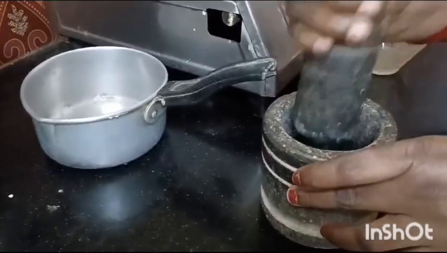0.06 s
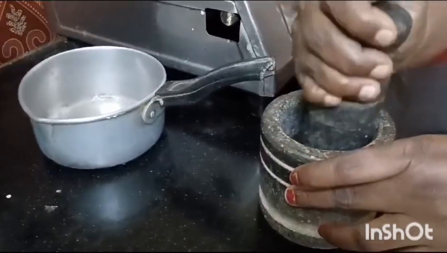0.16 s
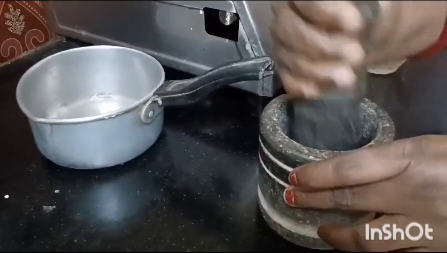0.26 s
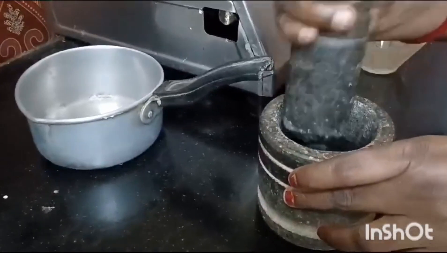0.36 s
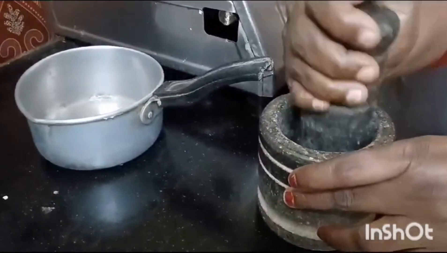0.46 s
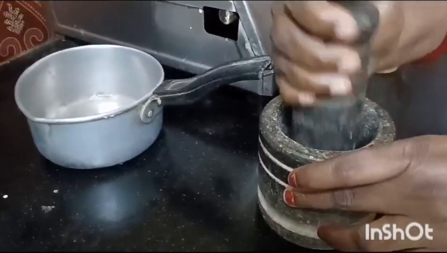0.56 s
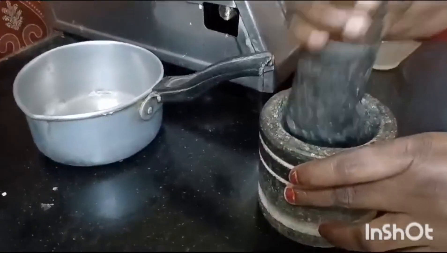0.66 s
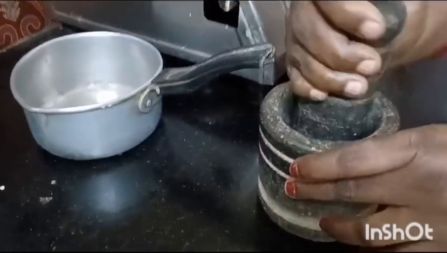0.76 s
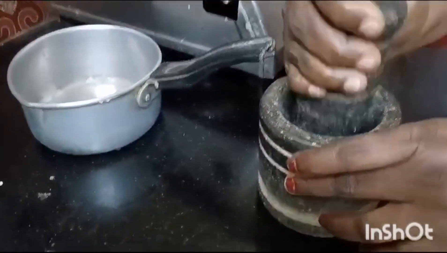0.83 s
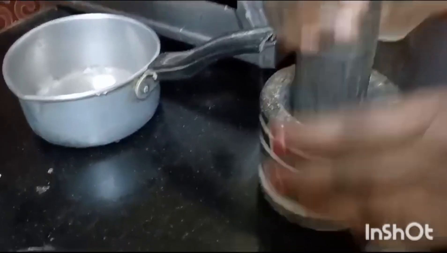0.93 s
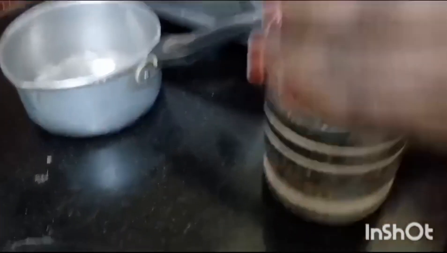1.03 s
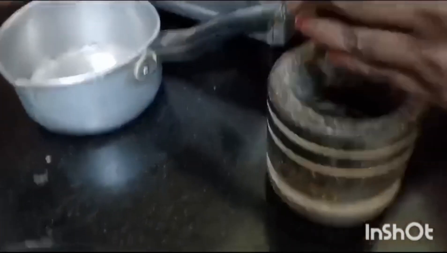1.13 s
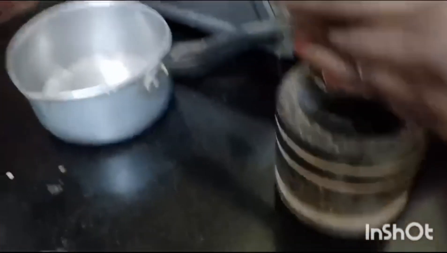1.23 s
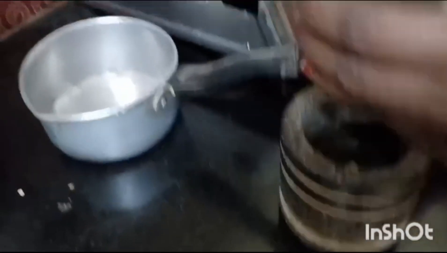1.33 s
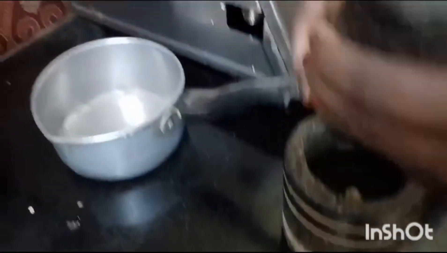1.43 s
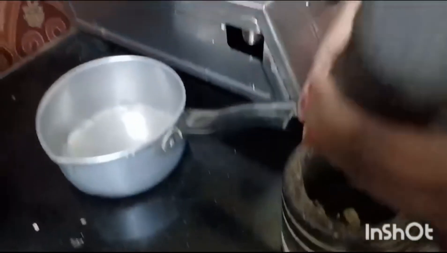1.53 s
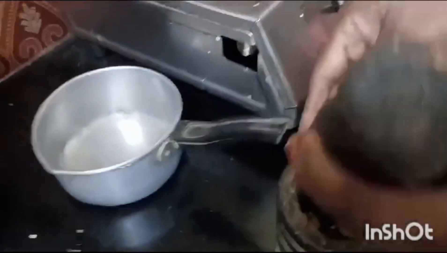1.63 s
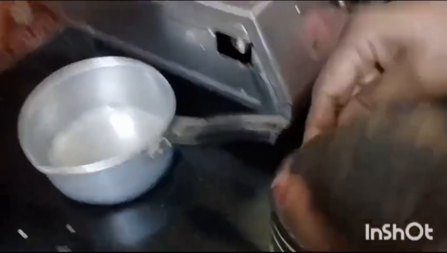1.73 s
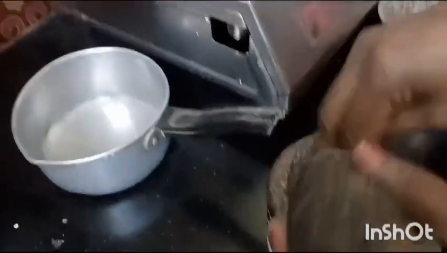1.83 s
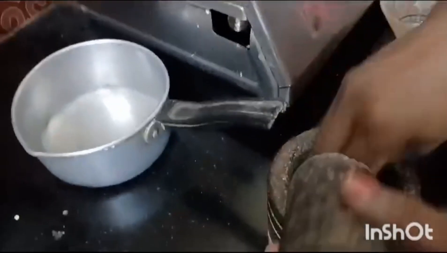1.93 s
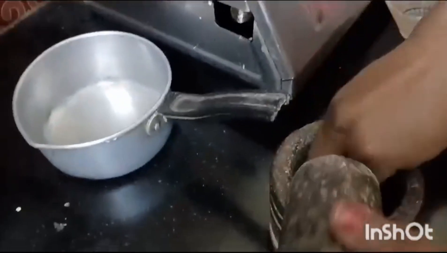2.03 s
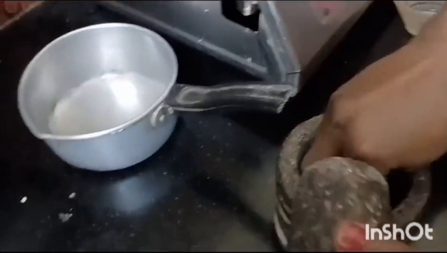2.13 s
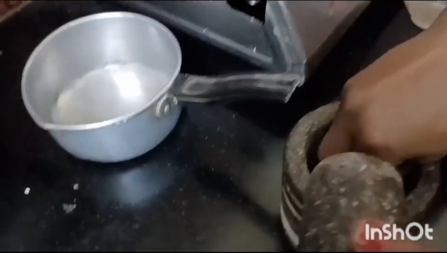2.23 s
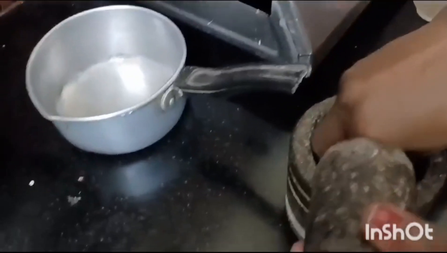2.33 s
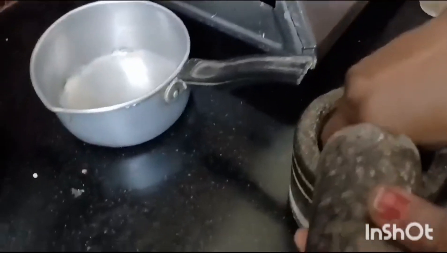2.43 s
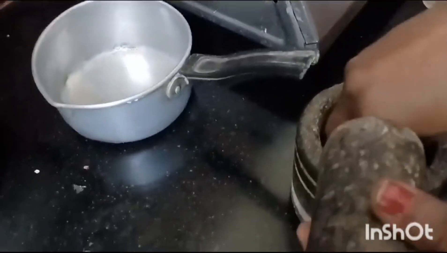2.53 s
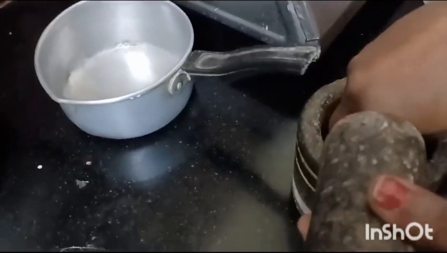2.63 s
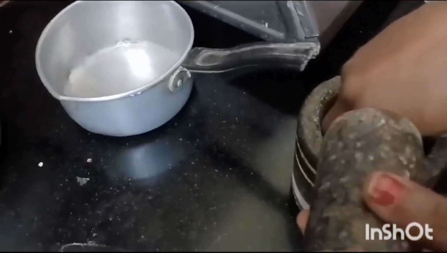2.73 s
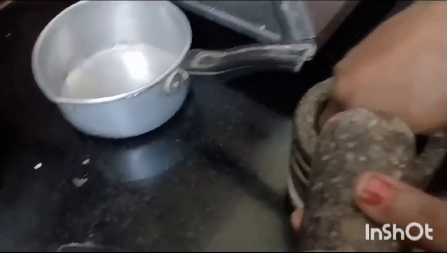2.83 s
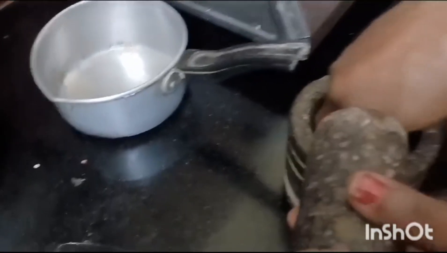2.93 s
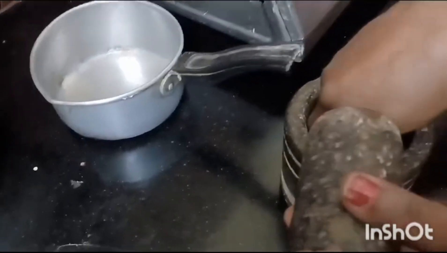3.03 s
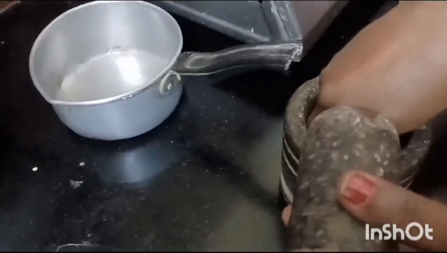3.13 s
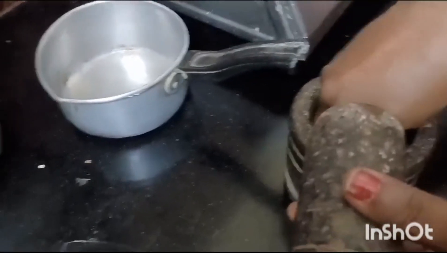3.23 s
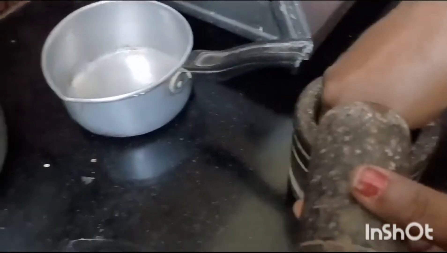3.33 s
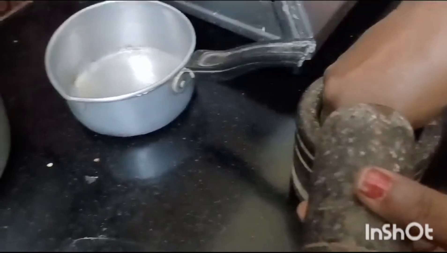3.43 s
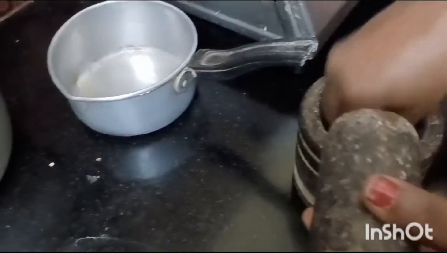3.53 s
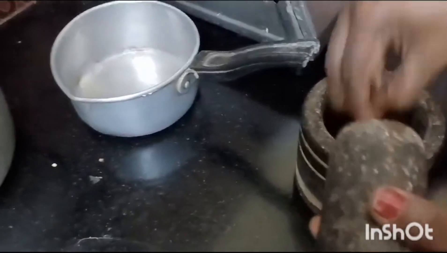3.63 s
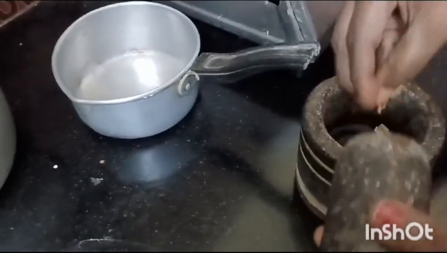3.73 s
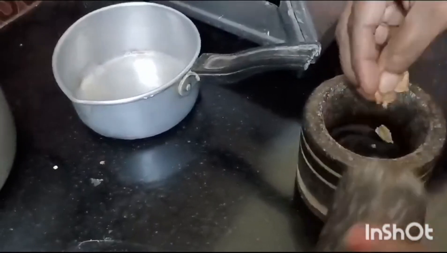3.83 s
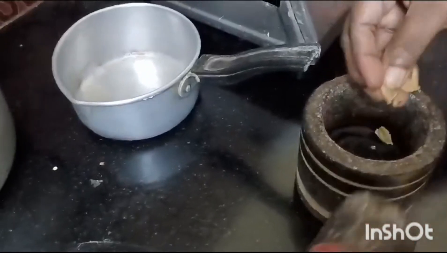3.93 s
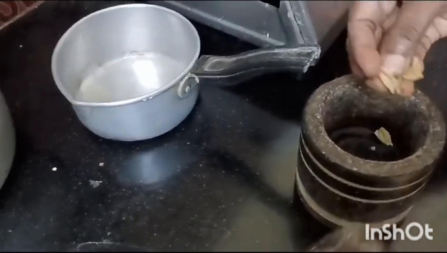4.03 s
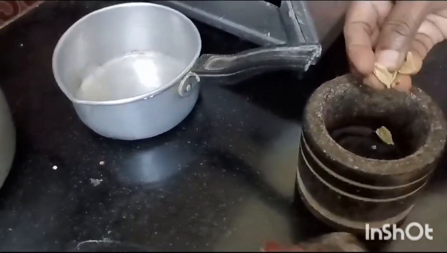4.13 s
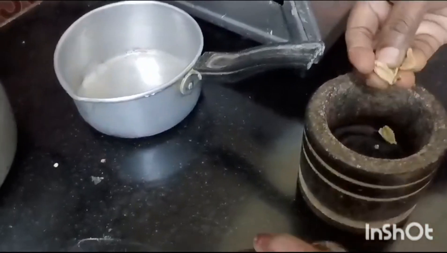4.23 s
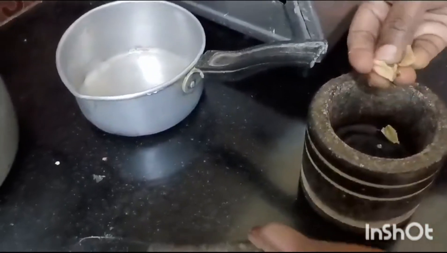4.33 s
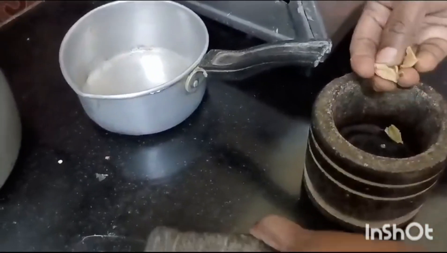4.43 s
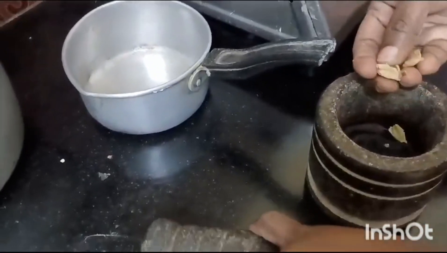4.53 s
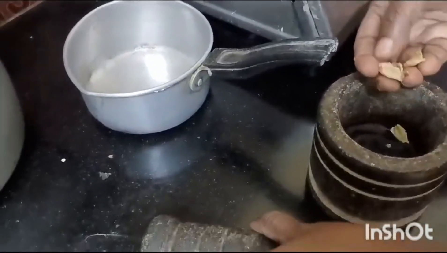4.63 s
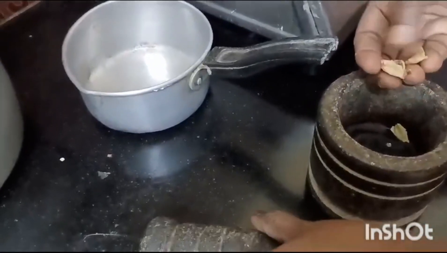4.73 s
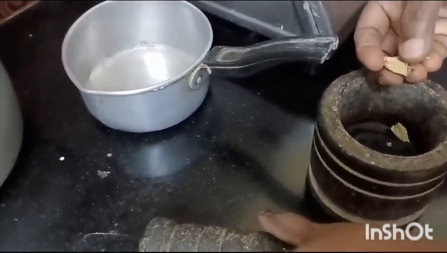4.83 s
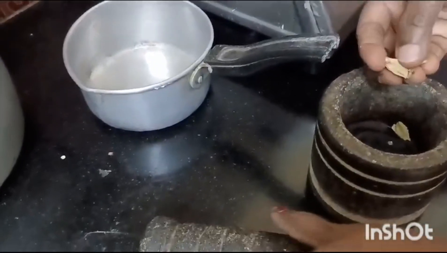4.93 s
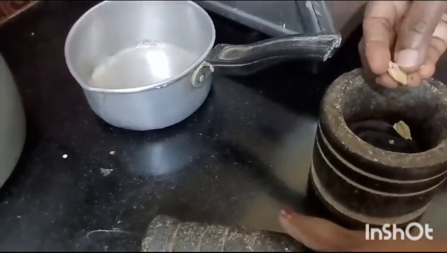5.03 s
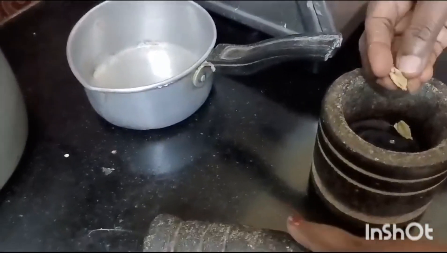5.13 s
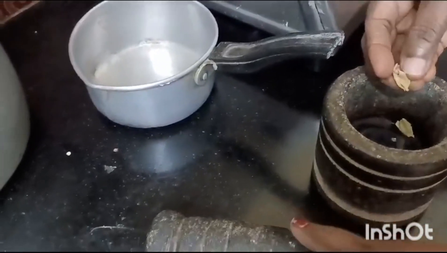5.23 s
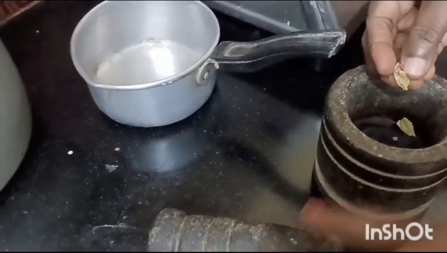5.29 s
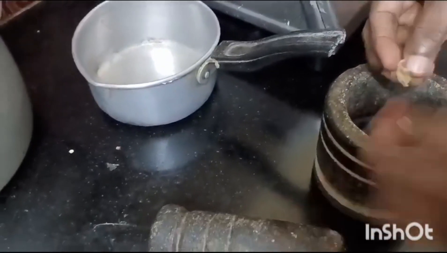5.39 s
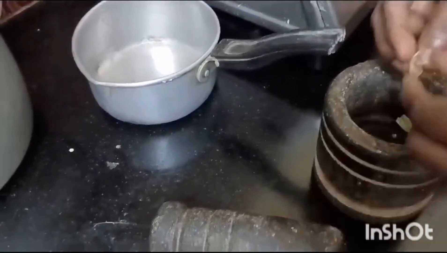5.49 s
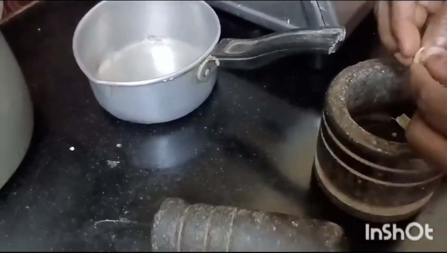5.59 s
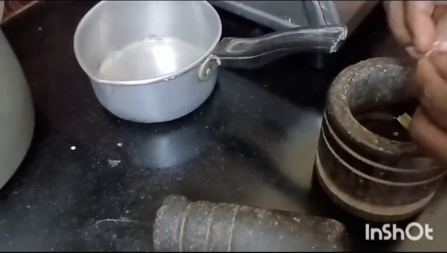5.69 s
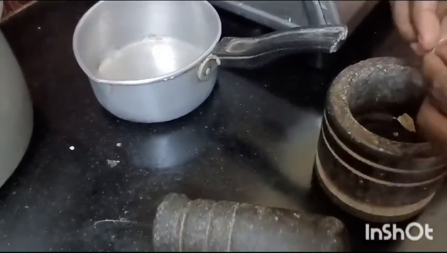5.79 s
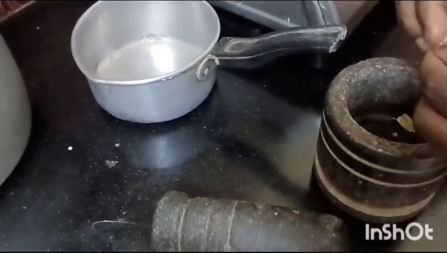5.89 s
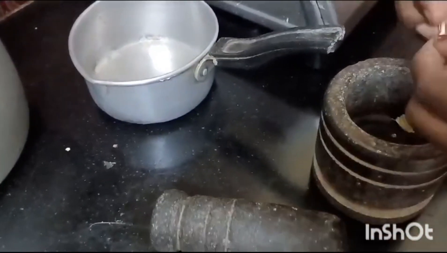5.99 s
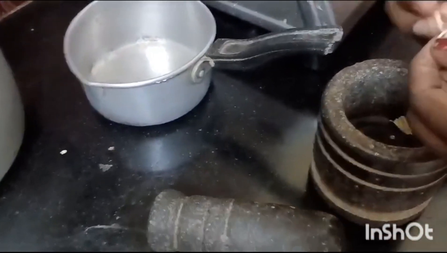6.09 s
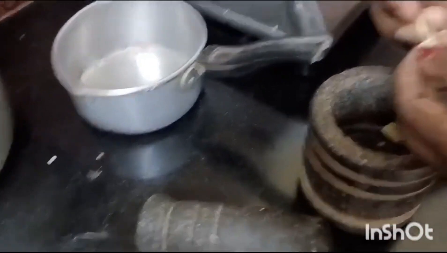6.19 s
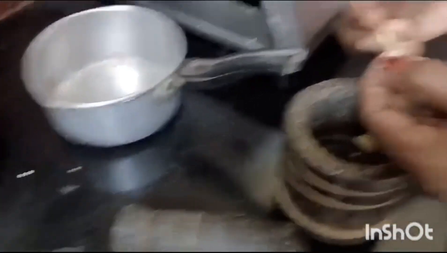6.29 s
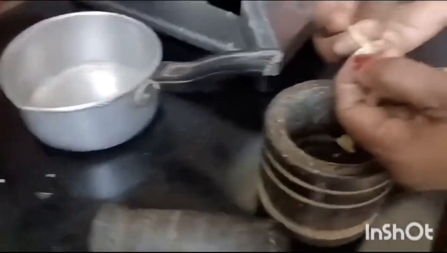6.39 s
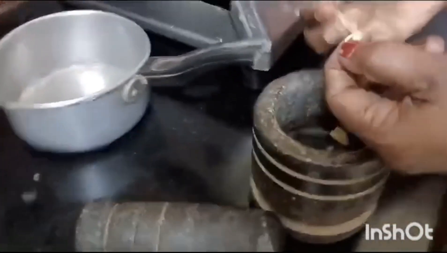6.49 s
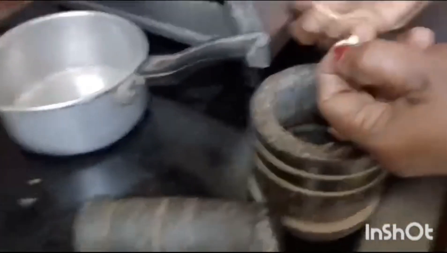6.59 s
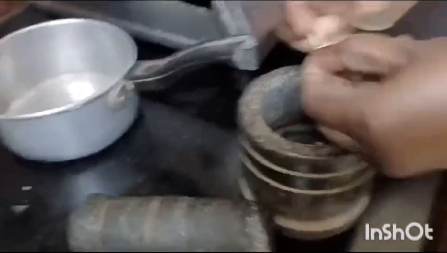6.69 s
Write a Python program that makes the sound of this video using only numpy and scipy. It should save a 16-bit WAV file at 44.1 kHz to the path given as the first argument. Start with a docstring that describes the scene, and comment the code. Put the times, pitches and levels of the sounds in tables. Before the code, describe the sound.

In an echoing kitchen, a short run of steady stone-on-stone blows crushes spices in a mortar, stopping after about a second. Quieter handwork follows, close to the microphone and to the right: bright bangle clinks, faint rubbing and dry husks snapping. The pestle knocks and rocks as it is put on the counter, then the bangles clink again and a cluster of soft bumps ends the work.

```python
"""The last of a stone-on-stone blow, then three more: a pestle pounds spices in a mortar on a kitchen counter.
The room is hard and echoing. Fingers stir the husks, and the pestle is laid down with a knock and rocks.
Pods are picked open by hand, with bright clinks as of bangles, close on the right, and dull bumps.
Struck things are decaying sine modes with noise echoes; rubbing, husks and air are coloured noise."""
import sys
import numpy as np
from scipy import signal
from scipy.fft import rfft, irfft, next_fast_len
from scipy.io import wavfile

SR = 44100
rng = np.random.default_rng(int(sys.argv[2]) if len(sys.argv) > 2 else 0)


def transcribe(signal):
    """Save signal, clipped to [-1, 1], as a 16-bit WAV file at the path in sys.argv[1]."""
    frames = np.atleast_2d(signal).T
    limited = np.clip(frames, -1, 1)
    pcm = np.round(limited * 32767).astype(np.int16)
    wavfile.write(sys.argv[1], SR, pcm)


N = 297675
AGE = np.arange(int(1.6 * SR)) / SR  # seconds since a sound began


def from_db(db):
    """Decibels to amplitude gain."""
    return 10 ** (np.asarray(db) / 20)


def at_hz(points, hz):
    """Read a table of levels on a log-frequency axis."""
    table = np.array(points)
    return np.interp(np.log(np.maximum(hz, 1)), np.log(table[:, 0]), table[:, 1])


def panned(x, pan_db):
    """Place a sound at constant power; positive pan_db leans left, negative leans right."""
    gains = from_db(np.array([[pan_db], [-pan_db]]) / 2)
    return x * gains / np.sqrt(np.mean(gains ** 2))


def add(out, start_s, x):
    """Mix a sound in at its start time, dropping whatever lies outside the scene."""
    start = round(start_s * SR)
    first, last = max(start, 0), min(start + x.shape[-1], N)
    out[:, first:last] += x[..., first - start:last - start]


def colour(x, spectrum):
    """Causal (minimum-phase) filter with the given spectrum, built by folding its cepstrum."""
    size = 2 * next_fast_len(x.shape[-1] // 2 + SR // 10)
    gain = from_db(at_hz(spectrum, np.fft.rfftfreq(size, 1 / SR)))
    cepstrum = irfft(np.log(gain))
    cepstrum[1:size // 2] *= 2
    cepstrum[size // 2 + 1:] = 0
    response = np.exp(rfft(cepstrum))
    return irfft(rfft(x, size) * response)[..., :x.shape[-1]]


def soften(x, cutoff_hz):
    """A soft contact carries no treble: low-pass at its cut-off."""
    lowpass = signal.butter(3, min(cutoff_hz, SR / 3), fs=SR, output="sos")
    return signal.sosfilt(lowpass, x + 1e-18)


def fade(t60_s):
    """Exponential decay by 60 dB in t60_s."""
    return np.exp(-np.minimum(np.log(1000) * AGE / t60_s, 40))


def ring(modes, swell_s):
    """Struck modes of alternating sign, which take a moment to build up."""
    sines = 0
    for k, (hz, db, t60_s) in enumerate(modes):
        sines = sines + (-1) ** k * from_db(db) * np.sin(2 * np.pi * hz * AGE) * fade(t60_s)
    return sines * (1 - np.exp(-AGE / swell_s))


# stereo width of the room, side against mid: pitch_hz [Hz], level_db [dB]
ROOM_WIDTH = [(60, -18.5), (125, -12.5), (250, -8.5), (500, -4.5), (1000, 1.5), (4000, -1.5), (10000, 2)]


def diffuse(size):
    """White stereo noise, alike in both channels in the bass and nearly unrelated in the treble."""
    mid, side = rfft(rng.standard_normal((2, size)))
    width = from_db(at_hz(ROOM_WIDTH, np.fft.rfftfreq(size, 1 / SR)))
    return irfft((mid + width * side * [[1], [-1]]) / np.sqrt(1 + width ** 2), size)


# how long the room rings in each band: pitch_hz [Hz], t60_s [s]
ROOM_T60 = [(60, 2), (150, 1.3939), (350, 1.0), (900, 1.1975), (2400, 0.8966), (5500, 0.9048), (9000, 0.55),
            (15000, 0.37)]


def room(early_db, early_t60_s):
    """Response to a click: strong reflections from close by, then a tail whose treble dies first."""
    noise = rfft(diffuse(len(AGE)))
    hz = np.fft.rfftfreq(len(AGE), 1 / SR)
    centres = np.array(ROOM_T60)[:, 0]
    tail = 0
    # neighbouring bands cross over, and each decays at its own rate
    for share, (_, t60_s) in zip(np.eye(len(centres)), ROOM_T60):
        band = irfft(noise * at_hz(np.c_[centres, share], hz), len(AGE))
        tail = tail + band * fade(t60_s)
    return tail * (1 + from_db(early_db) * fade(early_t60_s))


def echo_of(x, paths):
    """What the room gives back: convolution with its response, scaled to unit energy on the left."""
    return signal.fftconvolve(paths / np.linalg.norm(paths[0]), x[None], axes=1)[:, :len(AGE)]


def steady(spectrum):
    """Stereo noise of the given colour, rms 1."""
    x = colour(diffuse(N), spectrum)
    return x / x.std()


# spectrum of the room's faint air: pitch_hz [Hz], level_db [dB]
AIR_SPECTRUM = [(18, -46.5), (30, -17.5), (134, 0), (189, -12), (287, -10), (499, -16.5), (866, -19.5),
                (1460, -28.5), (4530, -35.5), (8520, -29.5), (16000, -42)]


def room_air():
    """The faint air of the room: steady coloured noise."""
    return from_db(-71.5) * steady(AIR_SPECTRUM)


def lumps(rate_hz, depth_db):
    """Uneven pressure: a random gain with a new target rate_hz times a second."""
    targets = rng.standard_normal(2000)
    wander = np.interp(np.arange(N) / SR * rate_hz, np.arange(2000), targets)
    return from_db(depth_db * wander)


def pressure(start_s, length_s):
    """One stroke presses in, holds, and dies away once the hand lets go."""
    attack_s, release_db_per_s = 0.077, 58
    age = np.arange(N) / SR - start_s
    return np.clip(age / attack_s, 0, 1) * from_db(-release_db_per_s * np.maximum(age - length_s, 0))


# strokes of the hand: start_s [s], length_s [s], rumble_db [dB], hiss_db [dB]
STROKES = [(2.26, .3, -65.5, -81), (2.67, 0.21, -56.5, -77), (3.02, 0.36, -61.5, -77),
           (3.719, 0.16, -59, -95), (4.05, 0.82, -66, -87), (5.84, 0.64, -60.5, -83.5),
           (6.42, .4, -51.5, -74)]
# spectra of the low and high parts of the rubbing: pitch_hz [Hz], level_db [dB]
RUMBLE_SPECTRUM = [(30, -33.5), (70, -17.5), (110, -3), (155, 5), (210, -6.5), (400, -17), (600, -25.5),
                   (1100, -28.5), (2500, -43.5), (8000, -74)]
HISS_SPECTRUM = [(1000, -33.5), (2000, -10.5), (2600, 2), (3400, -5.5), (4300, -2), (6000, -0.5),
                 (7500, -7), (15000, -12.5)]


def rubbing():
    """Fingers drag unevenly over stone and powder: a low rumble and a thin hiss."""
    rumble_gain = hiss_gain = 0
    for start_s, length_s, rumble_db, hiss_db in STROKES:
        press = pressure(start_s, length_s)
        rumble_gain = np.maximum(rumble_gain, from_db(rumble_db) * press)
        hiss_gain = np.maximum(hiss_gain, from_db(hiss_db) * press)
    rumble = rumble_gain * steady(RUMBLE_SPECTRUM) * lumps(rate_hz=78, depth_db=2.0)
    hiss = hiss_gain * steady(HISS_SPECTRUM) * lumps(rate_hz=64, depth_db=3.5)
    return rumble + hiss


# friction sings for a moment: start_s [s], length_s [s], pitch_hz [Hz], width_hz [Hz], level_db [dB]
SQUEAKS = [(-0.05, 0.23, 3080, 402, -53), (2.139, 0.16, 3040, 700, -67), (2.997, 0.57, 547, 69.6, -75),
           (3.821, 0.45, 640, 80, -72), (2.858, 0.6, 2570, 298, -91), (4.268, 0.18, 565, 90, -70),
           (5.771, 0.26, 3990, 300, -71.5)]


def squeaking():
    """Rubbed stone and skin excite one narrow resonance, which swells and fades."""
    out = np.zeros((2, N))
    for start_s, length_s, pitch_hz, width_hz, level_db in SQUEAKS:
        edges = [pitch_hz - width_hz / 2, pitch_hz + width_hz / 2]
        band = signal.butter(2, edges, "band", fs=SR, output="sos")
        tone = signal.sosfilt(band, diffuse(len(AGE)))
        stroke = np.sin(np.pi * np.minimum(AGE / length_s, 1) ** 0.707)
        add(out, start_s, from_db(level_db) * stroke * tone / tone.std())
    return out


# dry husks give way on the right: start_s [s], level_db [dB], length_s [s]
CRACKLES = [(1.558, -76.5, .13), (1.991, -64, 0.038), (2.098, -59, .01), (2.113, -51, 0.014),
            (2.147, -52, 0.032), (2.183, -43, 0.0098), (2.389, -65, .07), (2.516, -58.5, 0.08),
            (2.733, -61.5, 0.059), (3.452, -63.5, 0.029), (5.951, -72, 0.18), (6.085, -55.5, 0.013),
            (6.203, -57, 0.0047), (6.517, -58.5, .008), (6.693, -60.5, 0.051)]
# spectrum of a snapping husk: pitch_hz [Hz], level_db [dB]
HUSK_SPECTRUM = [(800, -64.5), (2200, -78.5), (3000, -65), (5800, -46), (7500, -54), (9500, -49),
                 (14000, -42), (16000, -46.5)]


def crackling():
    """A husk gives way in a short crunch: a random shower of tiny snaps of uneven size."""
    snaps_per_s, snap_spread_db, pan_db = 4500, 2.0, -9.5
    out = np.zeros((2, N))
    paths = room(early_db=11.5, early_t60_s=0.3)
    age = AGE[:SR // 5]
    for start_s, level_db, length_s in CRACKLES:
        happens = rng.random(len(age)) < snaps_per_s / SR
        signs = rng.choice([-1, 1], len(age))
        sizes = from_db(snap_spread_db * rng.standard_normal(len(age)))
        crunch = colour(happens * signs * sizes, HUSK_SPECTRUM)
        swell = np.sin(np.pi * np.minimum(age / length_s, 1) ** 0.69)
        dry_crunch = from_db(level_db) * crunch / crunch.std() * swell
        add(out, start_s, panned(dry_crunch, pan_db))
        # the echo stands less far to the right
        add(out, start_s, from_db(0.5) * panned(echo_of(dry_crunch, paths), pan_db / 2))
    return out


# modes of the kitchen counter: pitch_hz [Hz], level_db [dB], t60_s [s]
COUNTER_MODES = [(73.5, -25, 1.35), (96, -25.5, 1.3), (116, -38, 1.1), (155, -32, .85), (172, -24.5, .8),
                 (199, -23, .6), (214, -22, .6), (232, -14, .75), (328, -25, .9), (431, -23, .7),
                 (476, -26, .9), (581, -32, .8), (624, -29, .8), (694, -29, .7), (737, -27, .8),
                 (847, -24, .9), (919, -31, .8), (1041, -31, .75)]


def light_boom(lowest_hz):
    """Light knocks hardly move the deepest modes of the counter."""
    highpass = signal.butter(2, lowest_hz, "high", fs=SR, output="sos")
    return from_db(-11.5) * signal.sosfilt(highpass, ring(COUNTER_MODES, swell_s=0.019))


# hands and mortar bump the counter: start_s [s], level_db [dB], contact_hz (cut-off) [Hz], boom_db [dB]
BUMPS = [(2.395, -19.5, 129, -8), (2.743, -39, 740, 1), (2.759, -14, 109, -4), (4.29, -14.5, 98.5, 1),
         (5.901, -22.5, 880, -16), (5.926, -17.5, 780, -16), (6.042, -16, 1090, 0.5),
         (6.404, -26.5, 585, -14), (6.448, -13, 1400, -25), (6.477, -17, 860, -13), (6.579, -20.5, 510, 0),
         (6.666, -14, 870, -8)]
# spectrum of a padded thud: pitch_hz [Hz], level_db [dB]
BUMP_SPECTRUM = [(30, -25.5), (70, -23.5), (140, -2.5), (185, -19), (235, -1), (290, -8.5), (380, -0.5),
                 (480, 1.5), (610, -0.5), (760, -12), (1000, -5.5), (1300, -13.5), (1600, -11), (2400, -23),
                 (8000, -51)]


def bumping():
    """Padded contacts give a short, hollow thud without a clack."""
    out = np.zeros((2, N))
    boom = soften(light_boom(lowest_hz=129), 480)
    for start_s, level_db, contact_hz, boom_db in BUMPS:
        paths = room(early_db=-7.5, early_t60_s=0.2) * fade(1.74)
        thud = from_db(-9.5) * colour(paths, BUMP_SPECTRUM)
        add(out, start_s, from_db(level_db) * soften(thud + from_db(boom_db) * boom, contact_hz))
    return panned(out, pan_db=0.5)


def chatter(clinks, count):
    """Every clink is a run of touches in quick succession, each weaker than the last."""
    gap_s, loss_db = 0.0085, 9.5
    touches = []
    for start_s, level_db, echo_db in clinks:
        for k in range(count):
            touches.append((start_s + k * gap_s, level_db - k * loss_db, echo_db))
    return touches


# treble from the right is shaded on its way to the left ear: pitch_hz [Hz], level_db [dB]
SHADE = [(5500, 0), (8400, -12), (11000, -13), (13000, -18)]


def shaded(x):
    """A source close on the right: the left ear loses its treble."""
    return np.array([colour(x[0], SHADE), x[1]])


# bright clinks: start_s [s], level_db [dB], echo_db [dB]
CLINKS = [(0.955, -33, 4), (1.2215, -29, -2), (1.2352, -11.5, 5), (1.2738, -12, 1), (2.279, -31.5, -8),
          (5.029, -25, 12.5), (5.187, -44.5, -1.5), (5.421, -20, -2.5), (5.4251, -3.5, 3.5),
          (5.46, -1.5, 6), (5.79, -32, 7)]
# modes of the small hard rings: pitch_hz [Hz], level_db [dB], t60_s [s]
BANGLE_MODES = [(4307, -52, .05), (5030, -48, .08), (7628, -45, .04), (8348, -35, .07), (9530, -45, .05),
                (12350, -28, .035), (12615, -23, .045), (13430, -23, .07), (15300, -23, .025)]
# spectrum of the touch itself: pitch_hz [Hz], level_db [dB]
CLINK_SPECTRUM = [(1000, -61), (3400, -60), (4300, -37), (6000, -40), (7000, -44), (8400, -26), (9200, -34),
                  (11500, -32), (12600, -11.5), (14200, -31), (15300, -22), (16500, -52.5)]


def clinking():
    """Small hard rings touch close by on the right, each time with other strengths, and echo in both ears."""
    out, size = np.zeros((2, N)), SR // 5
    for start_s, level_db, echo_db in chatter(CLINKS, count=3):
        extras_db = rng.normal(0, 2, len(BANGLE_MODES))
        modes = [(hz, db + extra_db, t60_s) for (hz, db, t60_s), extra_db in zip(BANGLE_MODES, extras_db)]
        tones = ring(modes, swell_s=0.0002)[:size]
        touch = from_db(8.0) * colour(rng.standard_normal(size) * fade(0.04)[:size], CLINK_SPECTRUM)
        direct = tones + touch
        paths = room(early_db=10.0, early_t60_s=0.25)
        touch_echo = from_db(-21.0) * colour(paths, CLINK_SPECTRUM)
        tone_echo = from_db(-15.0) * echo_of(tones, paths)
        add(out, start_s, from_db(level_db) * shaded(np.array([direct, direct])))
        add(out, start_s, from_db(level_db + echo_db) * panned(touch_echo + tone_echo, pan_db=-6.0))
    return out


# the pestle is laid on the counter and rocks:
# start_s [s], level_db [dB], contact_hz (cut-off) [Hz], clack_db [dB], boom_db [dB]
KNOCKS = [(4.426, -4, 3380, 0.5, -4), (4.438, -13, 3200, 1, 6.5), (4.452, -5.5, 2380, -4.5, -8),
          (4.554, -7.5, 800, 3.5, 7), (4.593, -19, 1490, 7.5, 3), (4.607, -12, 795, -11.5, 3.5)]
# modes of the slab under the pestle: pitch_hz [Hz], level_db [dB], t60_s [s]
SLAB_MODES = [(950, -10.5, 0.0062), (1550, -13.5, 0.013), (2190, -2, 0.0022), (3500, -15, 0.0035)]
# spectrum of the knock's echo: pitch_hz [Hz], level_db [dB]
KNOCK_SPECTRUM = [(30, -54.5), (70, -12), (130, -16), (220, -2), (310, -12.5), (480, -5.5), (720, -16),
                  (900, -9), (1250, -14.5), (1900, -15), (3700, -29), (5000, -35), (16000, -35.5)]


def knocking():
    """The pestle meets the slab and rocks; the softer the contact, the duller the knock."""
    out = np.zeros((2, N))
    clack = ring(SLAB_MODES, swell_s=0.00039)
    boom = from_db(-0.5) * soften(light_boom(lowest_hz=290), 730)
    dying = 1 / (1 + (AGE / 0.33) ** 3)
    for start_s, level_db, contact_hz, clack_db, boom_db in KNOCKS:
        echo = from_db(-5.5) * colour(room(early_db=-5.0, early_t60_s=0.048), KNOCK_SPECTRUM)
        knock = echo + from_db(clack_db) * clack + from_db(boom_db) * boom
        add(out, start_s, from_db(level_db) * soften(dying * knock, contact_hz))
    return panned(out, pan_db=2.0)


def pestle_note(beat_hz, twin_db, damped_s):
    """Two close bending modes of the pestle beat, until the grip of the next lift stops them."""
    pitch_hz, t60_s = 4304, 0.69
    pair = ring([(pitch_hz, 0, t60_s), (pitch_hz + beat_hz, twin_db, t60_s)], swell_s=0.0071)
    return pair * np.clip((damped_s - AGE) / 0.02, 0, 1)


# pestle blows, the first just before the start:
# start_s [s], level_db [dB], boom_db [dB], ring_db (pestle note, before a common lift) [dB]
POUNDS = [(-0.165, -1.5, -1.5, -49), (0.1397, -1, 2.5, -46.5), (0.447, -0.5, 1.5, -37.5),
          (0.749, 0.5, -0.5, -54)]
# modes of the stone mortar: pitch_hz [Hz], level_db [dB], t60_s [s]
MORTAR_MODES = [(563.8, -13.5, 0.047), (1066.3, -5, 0.0093), (1387, -11, 0.021), (1750, -13, 0.02)]
# spectra of the thud and of the crushed spice: pitch_hz [Hz], level_db [dB]
THUD_SPECTRUM = [(30, -43.5), (60, -24), (128, -13.5), (165, -2), (235, -4), (280, -4.5), (350, -3),
                 (500, -5.5), (820, -8), (1400, -16), (2200, -24.5), (3500, -36), (5800, -40),
                 (8000, -60.5)]
GRIT_SPECTRUM = [(1000, -47), (3000, -29.5), (5500, -31), (7500, -32), (10000, -26), (15000, -28)]


def pounding():
    """A blow is a stone clack, a thud through the room, a counter boom, crushed grit and the pestle's note."""
    out = np.zeros((2, N))
    clack = from_db(1.3) * panned(soften(ring(MORTAR_MODES, swell_s=0.0003), 3200), pan_db=3.0)
    boom = panned(ring(COUNTER_MODES, swell_s=0.022), pan_db=3.0)
    note = pestle_note(beat_hz=8.26, twin_db=-6.0, damped_s=0.24)
    usual_paths = room(early_db=1.5, early_t60_s=0.14)
    for start_s, level_db, boom_db, ring_db in POUNDS:
        # the mortar stays put, so the blows share much of their echo
        paths = (usual_paths + room(early_db=4.5, early_t60_s=0.29)) / np.sqrt(2)
        thud = from_db(4.0) * colour(paths, THUD_SPECTRUM)
        crushed = colour(room(early_db=-13.0, early_t60_s=0.05), GRIT_SPECTRUM)
        grit = from_db(-16) * panned(crushed, pan_db=-2.0)
        stone = clack + from_db(ring_db + 3.5) * note
        add(out, start_s, from_db(level_db) * (thud + grit + stone + from_db(boom_db) * boom))
    return out


def scene():
    """All the work at the counter over the faint air of the room."""
    handling = rubbing() + squeaking() + crackling() + bumping() + clinking()
    return room_air() + handling + knocking() + pounding()


def record(dry):
    """The microphone sheds the deepest bass, the highest peaks are rounded and the top is cut."""
    highpass = signal.butter(2, 36, "high", fs=SR, output="sos")
    x = signal.sosfilt(highpass, dry)
    rounded = x / (1 + x ** 6) ** (1 / 6)
    top_cut = signal.ellip(10, 0.2, 80, 16400, fs=SR, output="sos")  # steep low-pass at 16400 Hz
    return signal.sosfilt(top_cut, rounded)


dry = scene()
out = record(dry)
transcribe(out)
```